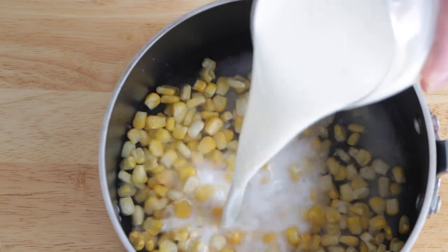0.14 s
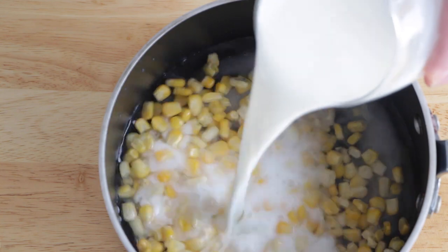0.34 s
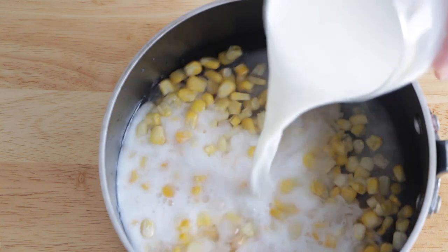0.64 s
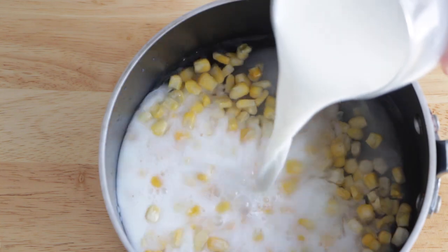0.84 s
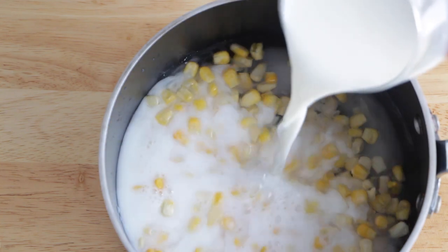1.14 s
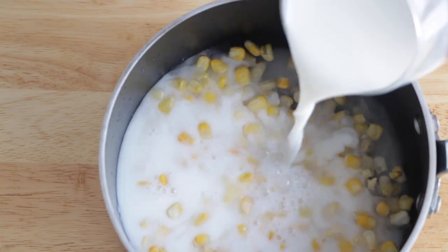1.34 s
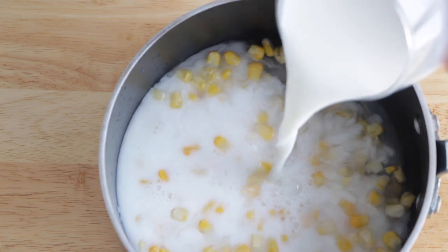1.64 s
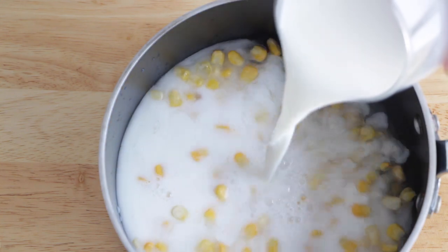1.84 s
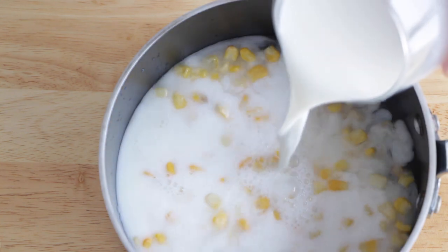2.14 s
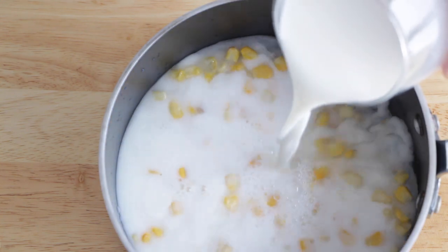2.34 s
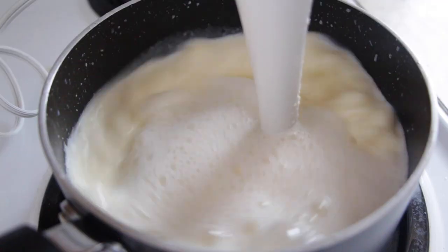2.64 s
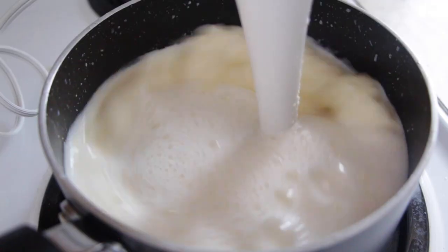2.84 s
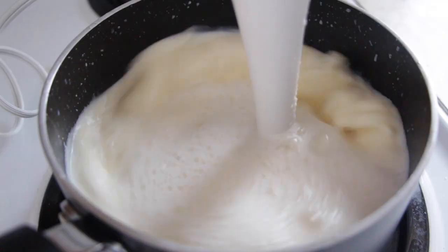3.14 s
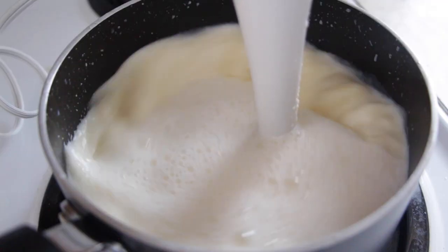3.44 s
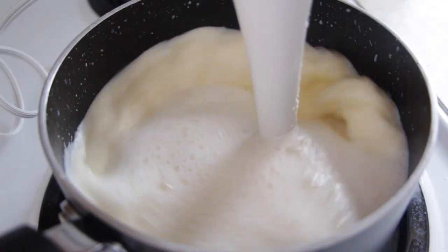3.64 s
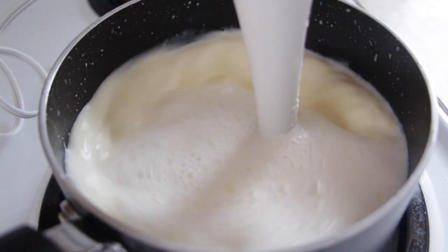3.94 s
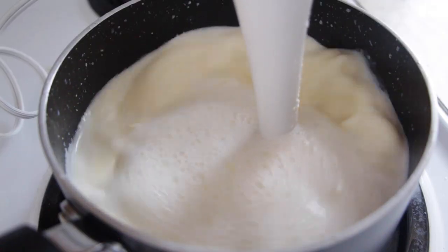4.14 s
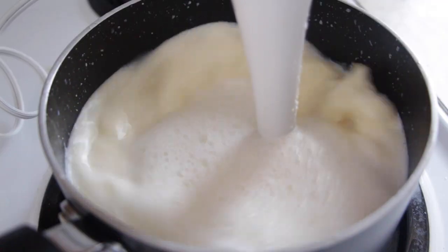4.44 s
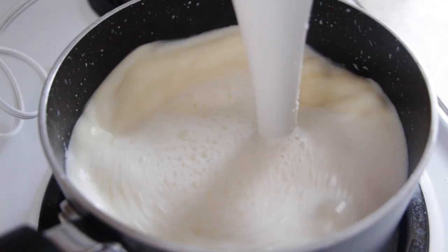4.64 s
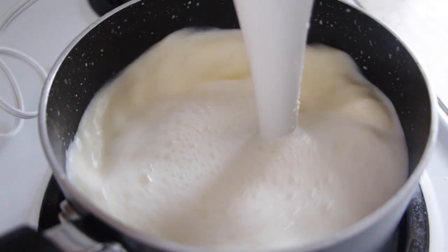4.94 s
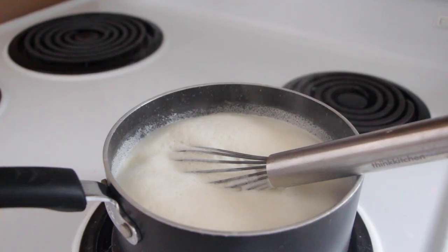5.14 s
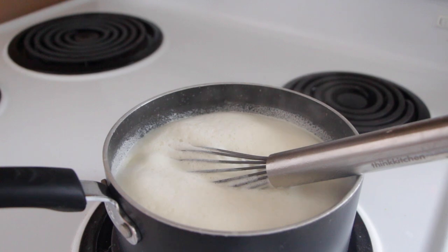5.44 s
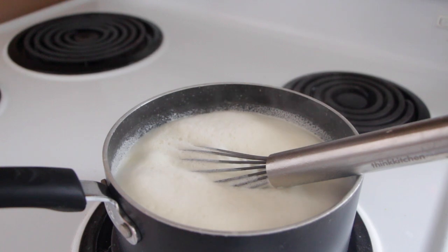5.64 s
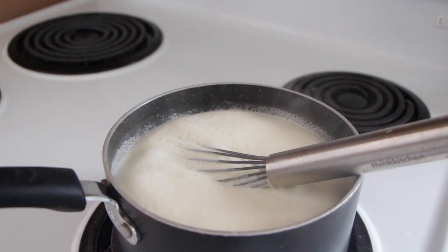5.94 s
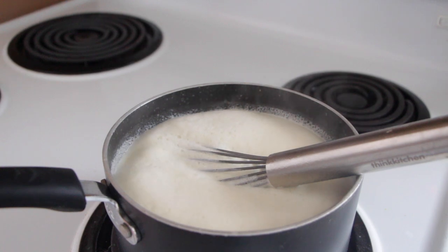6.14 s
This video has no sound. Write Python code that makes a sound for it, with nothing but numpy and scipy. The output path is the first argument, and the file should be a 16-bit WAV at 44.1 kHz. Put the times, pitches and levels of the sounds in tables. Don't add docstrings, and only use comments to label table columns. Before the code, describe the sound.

From 0 to 2.57 s, milk pours into a saucepan of corn, close to a small microphone in a home kitchen. The first half second is the brightest: sharp spatter and plinking drops, with a soft table boom around 0.2 s. A hollow gulp falls in pitch near 0.65 s, then a quieter trickle continues with scattered drips and glugs, busier around 1.5 s, and a snappy splash at 2.42 s, over faint fridge hum. At 2.57 s it cuts instantly to a very loud stick blender: a steady buzzing whine near 270 Hz with many harmonics, sagging and recovering under load, roaring milk, and clusters of hard kernel knocks, strong near 2.6, 2.9, 3.25, 3.7 and 4.1 s. At 5.14 s it drops abruptly to a quiet simmer with low thuds surging around 5.4-5.5 s, a metallic whisk tick at 5.33 s, a fainter one at 5.78 s, and tiny froth pops.

```python
import sys
import numpy as np
from scipy import signal
from scipy.fft import rfft, irfft, next_fast_len
from scipy.io import wavfile
from scipy.ndimage import map_coordinates

SR = 44100
rng = np.random.default_rng(int(sys.argv[2]) if len(sys.argv) > 2 else 0)


def elevation(decibels):
    levels = np.asarray(decibels, float)
    return 10 ** (levels / 20)


def master(y):
    cut = np.clip(np.atleast_2d(y).T, -1, 1)
    pcm = np.round(cut * 32767)
    wavfile.write(sys.argv[1], SR, pcm.astype(np.int16))


N = 276795
T = np.arange(N) / SR
FREE_HZ, CRUISE_HZ = 289.4, 276
CHURN_DB = -27.5


def blender():
    # [t/s, f/Hz]
    speed = [(2.6, 255.5), (2.755, 274.5), (2.93, 261.7), (3.045, 277.7), (3.34, 258.1), (3.52, 270.6),
             (3.72, 260.2), (3.89, 283.3), (4.09, 269.2), (4.25, 277.1), (4.44, 270.2), (4.53, 276.3),
             (4.62, 272.3), (4.96, 278.3), (4.99, 275.7), (5.05, 279.8), (5.13, 283.8)]
    # [t/s, load/dB, rise/s per 10 dB, fall/s per 10 dB]
    kernels = [(2.615, -18.5, 0.1, 0.049), (2.84, -21.5, 0.089, .2), (2.93, -16, 0.06, 0.029),
               (3.2, -20.5, 0.1, 0.0098), (3.24, -19, 0.029, 0.29), (3.35, -26.5, 0.23, .14),
               (3.5, -23.5, 0.065, 0.26), (3.62, -41, 0.22, .2), (3.71, -16, 0.13, 0.044),
               (3.8, -21, 0.048, 0.0047), (4.13, -18.5, 0.14, 0.022), (4.44, -21, 0.076, 0.05),
               (4.68, -28, 0.29, .11), (4.82, -29, 0.019, 0.25), (4.98, -24, 0.041, 0.06),
               (4.52, -17, 0.012, 0.013), (5.05, -30, 0.024, 0.03)]
    hz = eased(speed)
    load_db = swells(kernels, rest_db=-38)
    turn = np.cumsum(hz * (1 + 0.0006 * wobble(60))) / SR
    return whine(hz, load_db, turn) + churn(turn) + flung_milk(hz) + knocks(load_db, turn)


def whine(hz, load_db, turn):
    # [multiple of shaft speed, level/dB]
    shaft = [(1, 0), (2, -2.5), (3, -11), (4, -10.5), (5, -14), (6, -7.5), (7, -12.5), (8, -21), (9, -10.5),
             (10, -23), (11, -12.5), (12, -21), (13, -28), (14, -15), (15, -16), (16, -23), (17, -25)]
    # [multiple of shaft speed, level/dB]
    commutator = [(18, -26), (20, -21), (21, -26), (23, -30), (24, -25), (27, -25), (29, -28), (30, -21.5),
                  (33, -20.5), (40, -29)]
    # [multiple of shaft speed, level/dB]
    vent_orders = [(34, -4), (35, -1), (36, 3), (37, -1), (38, -4)]
    # [f/Hz, width/Hz, level/dB]
    vent = [(9820, 750, -21)]
    tone_db = -26.5 + 0.2071 * np.minimum(FREE_HZ - hz, 18)
    out = np.zeros(N)
    for order, db in shaft + commutator:
        rough = order in (3, 5)
        if rough:
            flutter_db = 4.5 * wobble(45)
        else:
            flutter_db = min(0.8 * order, 1.9) * wobble(24)
        if order < 3:
            level_db = tone_db + 0.19 * (order - 1) * (load_db + 26)
        else:
            level_db = CHURN_DB + 3.8
        if 26 < order < 31:
            level_db = level_db + 0.42 * (hz - CRUISE_HZ)
        level_db = level_db + db + flutter_db + 0.4 * rough * (load_db + 24)
        out += elevation(level_db) * shaft_tone(order, turn)
    for order, db in vent_orders:
        lift = abs(resonant(vent)(order * hz)) ** 2 / elevation(vent[0][2])
        out += elevation(CHURN_DB + db + 6 + 1.8 * wobble(25.07)) * lift * shaft_tone(order, turn)
    return out


def shaft_tone(order, turn):
    if order < 3:
        lag_turns = (0.34, 0.14)[order - 1]
        phase = -2 * np.pi * order * lag_turns
    elif order < 9:
        phase = np.angle(guard(order * FREE_HZ)) + 2 * np.pi * 0.09 * wobble(5)
    else:
        phase = -2 * np.pi * rng.random()
    return np.sqrt(2) * np.cos(2 * np.pi * order * turn + phase)


def churn(turn):
    # [f/Hz, level/dB per Hz]
    churn_colour = [(40, -35), (120, -23), (210, -15.5), (400, -19.5), (650, -8), (900, -19), (1500, -9.5),
                    (2700, -17.5), (5100, -25.5), (7200, -17.5), (8100, -24), (9000, -15.5), (12100, -21.5),
                    (12300, -32), (15700, -46)]
    # [f/Hz, width/Hz, level over the churn/dB]
    housing = [(3983, 405, 18.5), (900, 23, 20)]
    gate = 1 + 0.09 * np.cos(2 * np.pi * turn)
    colour = lambda f: elevation(along(churn_colour, f)) * (1 + abs(resonant(housing)(f)))
    roar = unit(filtered(gate * rng.standard_normal(N), colour))
    return elevation(CHURN_DB + 2.5 + 0.6 * wobble(25)) * roar


def flung_milk(hz):
    # [f/Hz, level/dB per Hz]
    slop_colour = [(110, -52), (160, -7), (215, 1.5), (340, -3.5), (460, -1.5), (560, -34)]
    # [f/Hz, level/dB per Hz]
    mist_colour = [(11500, -60), (12300, 3), (15700, -8), (15900, -80)]
    drag_hz = CRUISE_HZ - hz
    slop = elevation(-44 + 0.53 * drag_hz + 2.6 * wobble(15)) * noise(slop_colour)
    fine_mist = elevation(-57 + 0.14 * drag_hz + 1.5 * wobble(14)) * noise(mist_colour)
    return slop + fine_mist


def knocks(load_db, turn):
    # [t/s, peak/dB, ring f/Hz]
    whole_kernels = [(2.581, -13, 1380), (2.601, -12, 1130), (2.609, -5, 1450), (2.617, -11, 1420),
                     (2.645, -12, 1200), (2.817, -13, 900), (2.84, -10, 1050), (2.852, -13, 1000),
                     (2.904, -11, 1000), (2.919, -9, 1170), (2.931, -6, 1090), (2.939, -8, 1110),
                     (2.954, -13, 1200), (3.075, -13, 1090), (3.234, -8, 1240), (3.242, -12, 1160),
                     (3.249, -5, 1300), (3.253, -8, 1400), (3.272, -8, 1050), (3.283, -10, 950),
                     (3.306, -10, 1200), (3.329, -9, 950), (3.338, -10, 950), (3.347, -12, 1000),
                     (3.658, -10, 1310), (3.673, -6, 1140), (3.688, -10, 1300), (3.7, -8, 1240),
                     (3.711, -8, 1310), (3.719, -3, 1220), (3.731, -10, 1250), (3.764, -12, 1320),
                     (3.772, -12, 1160), (3.791, -11, 1100), (3.798, -10, 1200), (4.046, -12, 1070),
                     (4.065, -11, 1210), (4.09, -9, 1340), (4.098, -11, 1110), (4.105, -7, 1070),
                     (4.116, -10, 1280), (4.12, -9, 1240), (4.124, -10, 1390), (4.377, -14, 950),
                     (4.418, -12, 1100), (4.438, -11, 1000), (4.457, -10, 1160), (4.519, -9, 1100),
                     (4.672, -14, 1500), (4.818, -13, 1500), (4.981, -6, 1380), (5.049, -9, 1390)]
    blow_at = np.flatnonzero(np.diff(np.floor(turn)))
    draw = rng.standard_normal((len(blow_at), 2))
    sizes = elevation(3.5 * np.clip(draw[:, 0], -3, 1) + 1)
    struck = [np.argmin(abs(blow_at - s * SR)) for s, db, ring_hz in whole_kernels]
    sizes[struck] = 0
    jittered = np.clip(blow_at + (6 * draw[:, 1]).astype(int), 0, N - 1)
    blows = np.bincount(jittered, sizes, N)
    spatter = 0.025 * (1 + np.cos(2 * np.pi * turn)) * rng.standard_normal(N)
    force_db = 1.6 * (load_db + 22)
    ordinary = filtered((blows + spatter) * elevation(force_db + 4), guard)

    floor = lambda f: (1j * f / (420 + 1j * f)) ** 2
    impulse = np.eye(1, 400)[0]
    crest = np.argmax(filtered(impulse, lambda f: guard(f) * floor(f)))
    t, cracks = np.arange(-80, 400) / SR, np.zeros(N)
    for which, (s, db, ring_hz) in zip(struck, whole_kernels):
        at = blow_at[which] + crest - 80
        cycles = np.where(t < 0, 0.6, 1.1)
        ring = np.cos(2 * np.pi * ring_hz * t) * np.exp(-abs(t) * ring_hz / cycles)
        cracks[at:][:len(t)] += elevation(db - 1.5) * ring

    gurgle_db = -41 + 0.54 * (load_db + 20.5) + 2.5 * wobble(12)
    gurgle = elevation(gurgle_db) * grains(count=1500, hz=900, spread=0.2, cycles=2.5, scatter_db=3)
    return cracks + filtered(ordinary + gurgle, floor)


def guard(f):
    # [f/Hz, width/Hz, level/dB]
    bell = [(920, 230, 6.5), (1390, 660, 0), (2700, 1100, -14)]
    return -resonant(bell)(f) / (1 + 1j * f / 4900)


def pour():
    # [t/s, level/dB]
    flow = [
        (0.0, -53),
        (0.06, -50.5),
        (0.19, -55),
        (0.3, -55),
        (0.55, -52),
        (0.9, -55.5),
        (1.55, -52.5),
        (1.9, -52.5),
        (2.33, -55),
        (2.56, -51.5),
    ]
    # [t/s, level/dB]
    splash = [(0.02, -71), (0.08, -47), (0.138, -37.5), (0.19, -43.5), (0.29, -57), (0.42, -52),
              (0.62, -65), (1.38, -67.5), (1.52, -61), (1.72, -61), (1.86, -65)]
    # [f/Hz, level/dB per Hz]
    fizz_colour = [(880, -58), (1800, -22), (2470, -0.5), (3060, -1), (3540, -4), (4660, 2.5), (5450, -3.5),
                   (7090, 1.5), (7600, 2.5), (15500, 8)]
    (flow_db,) = curves(flow)
    (fizz_db,) = curves(splash)
    fizz = grains(count=6000, hz=4400, spread=0.5, cycles=5.7, scatter_db=6.5)
    fizz = unit(filtered(fizz, lambda hz: elevation(along(fizz_colour, hz))))
    gurgle = grains(count=2000, hz=1180, spread=0.386, cycles=4, scatter_db=-0.5)
    stream = elevation(fizz_db + 2.5) * fizz + elevation(flow_db - 2 + 1.63 * wobble(12.37)) * gurgle
    return stream + drops() + sprays() + glugs() + kitchen()


def drops():
    # [t/s, peak/dB, bubble f/Hz]
    falling_drops = [(0.0788, -24.5, 2570), (0.089, -20.5, 3120), (0.1, -24, 3040), (0.1117, -21, 3900),
                     (0.131, -35, 1950), (0.132, -25.5, 2480), (0.1695, -28, 2030), (0.762, -46, 4500),
                     (0.1702, -16.5, 3600), (0.171, -22, 2470), (0.2006, -35, 2300), (0.237, -34.5, 2290),
                     (0.336, -26.5, 3220), (0.382, -26, 4430), (0.408, -30.5, 3400), (0.4167, -25, 5140),
                     (0.4708, -35.5, 3330), (0.45, -40, 2700), (0.507, -31.5, 2530), (0.6385, -28, 2690),
                     (0.652, -45, 2820),
                     (0.81, -40.5, 2470), (1.002, -46, 2450), (1.052, -41, 2620), (1.207, -35, 2540),
             (1.224, -46, 4100), (1.251, -29, 2540), (1.181, -48, 2950), (1.3632, -41, 2570),
             (1.366, -42, 4500), (1.429, -41, 2500), (1.545, -33, 4500), (1.587, -37, 3350),
             (1.611, -44, 4600), (1.681, -36, 4400), (1.718, -42, 2480), (1.44, -32, 4060),
             (1.459, -34, 3100), (1.475, -36, 2510), (1.486, -33, 2540), (1.543, -32, 2540),
             (1.579, -36, 3160), (1.609, -40, 3200), (1.643, -34, 3910), (1.664, -30, 4240),
             (1.7399, -33.5, 4030), (1.798, -40.5, 4200), (1.9213, -45, 3950), (1.933, -30, 4030),
             (2.1585, -42, 2500), (2.1923, -32, 2460), (2.2237, -37, 2900), (2.236, -42.5, 2520),
             (2.41, -39, 2900), (2.393, -42.5, 2520), (2.434, -31.5, 2560), (2.478, -42, 4030)]
    # [f/Hz, t60/s]
    pan_wall = [(2500, 0.1), (3350, 0.08), (4050, 0.035)]
    out, t = np.zeros(N + SR), np.arange(SR // 12) / SR
    for s, db, hz in falling_drops:
        wall = np.zeros(len(t))
        for mode_hz, t60 in pan_wall:
            wall += elevation(-27 + rng.normal(0, 3) - 60 * t / t60) * np.sin(2 * np.pi * mode_hz * t)
        late = np.clip(t - 0.012 * rng.random(), 0, 1)
        twin = elevation(-9) * bubble(rng.uniform(2500, 4500), 7, late)
        rise = 1 - np.exp(-0.6 * hz * t)
        add(out, s, elevation(db) * rise * (bubble(hz, 7, t) + twin + wall), room_db=-1)
    return out[:N]


def sprays():
    # [t/s, peak/dB, f/Hz]
    thrown = [(0.0493, -16.5, 11200), (0.0697, -32, 11500), (0.0897, -27, 8150), (0.101, -21.5, 5950),
              (0.171, -20, 6600), (0.202, -25, 6190), (0.2374, -33, 7000), (0.3341, -30.5, 7140),
              (0.381, -37, 11100), (0.4063, -27, 6580), (0.4146, -23.5, 6640), (0.4718, -33, 11100),
              (0.5045, -26.5, 6500), (0.6384, -35, 9420), (0.652, -32.5, 8350), (1.0026, -40, 5810),
              (1.1663, -34.5, 11700), (1.207, -44, 7110), (1.2496, -26.5, 10900), (1.544, -40, 5700),
              (1.664, -40, 5950), (1.932, -35.5, 10400), (2.1914, -41, 9900), (2.2503, -44, 6700),
              (2.4245, -19.5, 7430), (2.432, -32, 7460), (2.4255, -28, 9700)]
    cycles, overtone = 2.67, 1.45
    out, t = np.zeros(N + SR), np.arange(SR // 12) / SR
    for s, db, hz in thrown:
        snap = np.gradient(elevation(-13 - 60 * t / 0.00036) * rng.standard_normal(len(t)))
        ring = bubble(hz, cycles, t)
        if overtone * hz < SR / 3:
            ring = ring + elevation(-10) * bubble(overtone * hz, cycles, t)
        rise = 1 - np.exp(-hz * t / 0.51)
        add(out, s, elevation(db + 5.5) * (ring * rise + snap), room_db=2.5)
    bright = signal.butter(7, 5700, "high", fs=SR, output="sos")
    return signal.sosfilt(bright, out)[:N]


def glugs():
    # [t/s, peak/dB, f/Hz]
    large = [(0.176, -32, 1510), (0.181, -30.5, 675), (0.19, -33, 1500), (0.2, -33, 700), (0.24, -42, 1300),
             (0.468, -36, 1750), (0.5, -36, 1500), (0.509, -32, 1420), (0.53, -40, 1200),
             (0.575, -39, 1450), (0.605, -43, 1250), (1.004, -39.5, 945), (1.035, -38, 1150),
             (1.067, -35.5, 1060), (1.096, -42, 1050), (1.25, -32, 1070), (1.268, -33, 1050),
             (1.31, -44, 1050), (1.44, -43, 1670), (1.484, -33, 1590), (1.508, -26.5, 1490),
             (1.518, -31, 1100), (1.545, -35, 1390), (1.58, -34, 1450), (1.666, -33.5, 1380),
             (1.687, -34, 845), (1.69, -37, 1400), (1.941, -32.5, 1200), (2.158, -38, 745),
             (2.196, -36, 700), (2.19, -34, 1300), (2.383, -40.5, 1140), (2.483, -38, 1250)]
    # [t/s, peak/dB, f/Hz]
    bloop = [
        (0.6405, -30, 730),
        (0.6575, -28, 690),
        (0.672, -33, 650),
        (0.686, -33, 632),
        (0.703, -38, 537),
    ]
    # [t/s, peak/dB, f/Hz]
    slosh = [
        (0.729, -32, 396),
        (1.548, -28, 517),
        (1.589, -38, 260),
    ]
    out, t = np.zeros(N + SR), np.arange(SR // 12) / SR
    glug = lambda db, hz, cycles: elevation(db - 4.5) * bubble(hz, cycles, t) * (1 - np.exp(-hz * t / 0.24))
    for s, db, hz in large:
        add(out, s, glug(db, hz, 2.64), room_db=5.5 + 3 * np.log2(hz / 1000))
    for s, db, hz in bloop:
        swell = (1 - np.exp(-hz * t / 2.9)) ** 2 * np.exp(-hz * t / 2.9)
        sagging = np.sin(2 * np.pi * hz * t * (1 - 1.5 * t))
        add(out, s, elevation(db + 14) * swell * sagging, room_db=-6)
    for s, db, hz in slosh:
        add(out, s, glug(db, hz, 0.76), room_db=6)
    return out[:N]


def snaps():
    # [t/s, peak/dB, f/Hz]
    contacts = [(0.0492, -20, 11100), (0.0518, -21, 11600), (0.0702, -22, 11500), (0.108, -23, 4800),
                (0.113, -24, 4500), (0.133, -23, 4510), (0.1703, -11.5, 4200), (0.1838, -23, 2900),
                (0.2018, -25, 6190), (0.238, -31, 7090), (0.3348, -29, 3320), (0.382, -32, 4430),
                (0.4163, -27, 6600), (0.5048, -28, 6290), (0.638, -33, 2630), (1.1672, -41, 12000),
                (1.2067, -39, 2520), (1.2498, -32, 2520), (1.933, -31, 3890), (2.1595, -36, 2500),
                (1.545, -30, 4500), (1.5085, -34, 1600), (2.4249, -28, 8000), (5.345, -16, 7930),
                (5.351, -15, 5450)]
    out, t = np.zeros(N + SR), np.arange(SR // 200) / SR
    for s, db, hz in contacts:
        add(out, s, elevation(db + 1) * bubble(hz, 0.9, t), room_db=-11)
    return out[:N]


def whisk():
    # [t/s, peak/dB, low modes/dB, hiss/dB]
    ticks = [
        (5.3328, -16.5, 0.5, 1.5),
        (5.775, -29, -21, -0.5),
    ]
    # [f/Hz, level/dB, t60/s]
    wire_modes = [(2040, -12, 0.28), (2820, -9, 0.18), (3470, -2, 0.15), (4020, 1.5, 0.14),
                  (5440, -2, 0.28), (5670, -8, 0.29), (5970, -17, 0.17), (6713, -17, 0.14),
                  (7350, -3, 0.15), (8100, -1, 0.22), (9400, -6, 0.18), (10100, -1.5, 0.11),
                  (10900, -11, 0.17), (11720, -24, 0.15)]
    # [f/Hz, level/dB per Hz]
    tick_air = [(530, -62), (900, -35), (1470, -4.5), (1620, -20), (1990, -15), (3090, -14), (5310, -3.5),
                (12100, -10), (15800, -34)]
    out, t = np.zeros(N), np.arange(SR // 3) / SR
    for s, db, low_db, hiss_db in ticks:
        wires = np.zeros(len(t))
        for hz, level, t60 in wire_modes:
            decay = elevation(level + low_db * (hz < 4500) - 60 * t / t60)
            ring = np.sin(2 * np.pi * (hz * t + 0.13 * wobble(210, size=len(t))))
            wires += decay * (1 - np.exp(-t * hz / 18)) * ring
        colour = [(hz, level + low_db * (hz < 1600)) for hz, level in tick_air]
        colour += [(15998 + 200 * (low_db > 0), -120)]
        air = elevation(hiss_db - 60 * t / 0.31) * noise(colour, size=len(t))
        shape = (1 + 1.2 * np.exp(-t / 0.018)) * (1 - np.exp(-t / 0.003))
        chatter = 1 + 0.1 * wobble(250, size=len(t))
        out[round(s * SR):][:len(t)] += elevation(db - 15.5) * (wires + air) * shape * chatter
    return out


def simmer():
    # [t/s, level/dB, rise/s per 10 dB, fall/s per 10 dB]
    boils = [
        (5.412, -38.5, 0.18, .024),
        (5.516, -39, 0.11, 0.029),
        (5.56, -45, .1, .6),
        (5.91, -43, 0.52, .035),
        (6.18, -46, 2.5, 0.034),
        (6.26, -51, .12, .02),
    ]
    # [f/Hz, width/Hz, level/dB]
    pan_modes = [(111, 29, -7), (231.6, 34, 1), (339, 21.3, 1.5), (416, 51, -3.5)]
    # [f/Hz, level/dB per Hz]
    stove_air = [(15, -48), (25, -13), (157, -16), (222, -2), (276, -8.5), (425, -9), (587, -15),
                 (791, -15.5), (1120, -21.5), (4570, -30), (5520, -33.5), (10500, -27.5), (15800, -38)]
    ring = resonant(pan_modes)
    thuds = rng.standard_normal(N) * elevation(np.clip(5.4 * wobble(50), -8, 5))
    rumble = elevation(swells(boils, rest_db=-59)) * unit(filtered(thuds, lambda f: ring(f) ** 2))
    boom = elevation(-61.5 + 3.4 * wobble(11)) * table()
    return rumble + elevation(-48.5) * noise(stove_air) + boom + fridge_line(db=-57) + whisk()


def froth():
    # [t/s, peak/dB, f/Hz]
    foam = [
        (5.4635, -44, 10500),
        (5.731, -52, 7000),
        (5.743, -52, 6000),
        (5.847, -48, 10500),
        (5.855, -52, 8500),
        (5.876, -46, 9000),
        (5.888, -50, 7000),
        (5.941, -48, 10500),
    ]
    out, t = np.zeros(N + SR), np.arange(SR // 200) / SR
    for s, db, hz in foam:
        add(out, s, elevation(db) * bubble(hz, 2.5, t) * (1 - np.exp(-hz * t)), room_db=-8)
    return out[:N]


def nudged_table():
    # [t/s, level/dB, rise/s per 10 dB, fall/s per 10 dB]
    nudges = [(0.14, -31.5, .02, 0.1), (0.26, -28, 0.1, 0.038), (0.41, -46, .05, .06),
              (0.8, -50, 0.99, 0.16), (1.1, -46.5, .15, 0.041), (1.28, -50.5, .02, .7),
              (1.58, -48, .07, 0.092), (1.78, -44, 0.089, 0.033), (2.06, -53, .9, .03),
              (2.57, -48, 0.091, 0.038), (2.93, -54.5, 0.25, 0.05), (3.35, -44.5, 0.081, 0.096),
              (3.6, -49, .1, 0.2), (3.86, -55, .02, 0.019), (4.28, -54.5, 0.61, 0.026),
              (4.36, -51.5, 0.016, 0.29), (4.84, -53.5, 0.36, 0.019), (5.14, -53, .02, 0.022)]
    return elevation(swells(nudges, rest_db=-67)) * table()


def table():
    return np.sqrt(2) * np.sin(2 * np.pi * (82 * T + 0.14 * wobble(11)))


def kitchen():
    # [f/Hz, level/dB]
    hum = [(118.4, -53), (263.8, -61.5), (360.7, -65), (538.3, -63), (748.3, -87)]
    # [f/Hz, level/dB per Hz]
    kitchen_air = [(15, -45), (25, 2), (107, 1.5), (141, -6.5), (184, -10), (255, -5), (437, -16),
                   (527, -12), (729, -25), (2260, -19.5), (2460, -54), (5520, -31.5), (15800, -32)]
    out = elevation(-54.5) * noise(kitchen_air)
    for hz, db in hum:
        line = np.sin(2 * np.pi * (hz * T + 0.2 * wobble(6.2)))
        out += elevation(db + 1.5 + 1.1 * wobble(7.25)) * line
    return out


def fridge_line(db):
    return elevation(db + 1.9 * wobble(3.9)) * np.sin(2 * np.pi * (118 * T + 0.11 * wobble(7)))


def left_right_difference(quiet):
    # [f/Hz, level/dB per Hz]
    hiss_colour = [(59, -54), (100, -22), (396, -5), (2240, -10), (2710, -6), (3720, -5), (15700, -3)]
    # [t/s, level/dB]
    treble_bursts = [
        (3.165, -43),
        (3.515, -42),
        (3.835, -47),
        (4.0, -41),
    ]
    treble = noise([(5300, -120), (5500, 0), (11000, -2), (13500, -8), (13800, -120)])
    side = elevation(-66.5) * noise(hiss_colour) * quiet
    for s, db in treble_bursts:
        side += treble * elevation(db) * np.clip(1.5 - abs(T - s) / 0.016, 0, 1)
    return side


def bubble(hz, cycles, t):
    turns = hz * t / np.clip(cycles, 0.5, 30)
    return np.sin(2 * np.pi * hz * t * (1 + 0.0039 * turns)) * np.exp(-turns)


def grains(count, hz, spread, cycles, scatter_db):
    draw = rng.random((count, 2))
    pitch = np.clip(hz * np.exp(spread * rng.standard_normal(count)), 200, 15000)[:, None]
    t = np.arange(400) / SR
    size = elevation(scatter_db * (4.3 * draw[:, 1:] - 2))
    ring = np.sin(2 * np.pi * pitch * t) * np.exp(-pitch * t / cycles) * size
    at = (draw[:, :1] * N).astype(int) + np.arange(400)
    close = np.bincount(at.ravel(), ring.ravel(), N + 400)[:N]
    return unit(close + elevation(1.5) * signal.fftconvolve(close, echo())[:N])


def add(out, s, close, room_db):
    wet = elevation(room_db) * signal.fftconvolve(close, echo())
    start = round(s * SR)
    out[start:][:len(close)] += close
    out[start + 60:][:len(wet)] += wet


def echo():
    # [f/Hz, t60/s]
    room = [(500, 0.28), (3000, 0.18), (12000, 0.17)]
    hz, t, z = signal.stft(rng.standard_normal(SR // 4), SR, nperseg=256)
    decay = elevation(-60 * t / along(room, hz)[:, None])
    tail = signal.istft(z * decay, SR, nperseg=256)[1]
    return tail / np.linalg.norm(tail)


def swells(rows, rest_db):
    levels = []
    for s, db, rise, fall in rows:
        levels.append(db - 10 * np.where(T < s, (s - T) / rise, (T - s) / fall))
    return np.max(levels, axis=0).clip(rest_db)


def eased(rows):
    s, v = np.transpose(rows)
    index = np.arange(len(s))
    step, part = np.divmod(np.interp(T, s, index), 1)
    return np.interp(step + 0.5 - 0.5 * np.cos(np.pi * part), index, v)


def curves(rows):
    s, *cols = np.transpose(rows)
    return [np.interp(T, s, c) for c in cols]


def wobble(rate, size=N):
    knots = rng.standard_normal(int(size * rate / SR) + 4)
    return map_coordinates(knots, [T[:size:8] * rate]).repeat(8)[:size]


def noise(spectrum, size=N):
    return unit(filtered(rng.standard_normal(size), lambda hz: elevation(along(spectrum, hz))))


def resonant(modes):
    def response(f):
        total = 0
        for k, (c, w, db) in enumerate(modes):
            total = total + (-1) ** k * elevation(db) * 1j * f * w / (c * c - f * f + 1j * f * w)
        return total
    return response


def filtered(x, response):
    m = next_fast_len(len(x) + 8192)
    return irfft(rfft(x, m) * response(np.fft.rfftfreq(m, 1 / SR)), m)[:len(x)]


def along(points, hz):
    f, v = np.transpose(points)
    return np.interp(np.log(hz + 1), np.log(f + 1), v)


def unit(x):
    return x / np.sqrt(np.mean(x ** 2) + 1e-20)


def scene():
    cuts = (2.5748, 5.144)
    first, second = (np.clip((T - s) / 0.000087, 0, 1) for s in cuts)
    mono = (1 - first) * pour() + first * (1 - second) * blender() + second * simmer()
    mono += snaps() + froth() + (1 - second) * nudged_table()
    side = left_right_difference(quiet=1 - first + second)
    fade_in = np.clip((T - 0.004) / 0.0016, 0, 1)
    return np.array([mono + side, mono - side]) * fade_in


def roll_off(x):
    return signal.sosfilt(signal.butter(12, 16630, fs=SR, output="sos"), x)


def record(dry):
    kept = np.array([filtered(x, lambda hz: hz < 15750) for x in dry])
    return roll_off(kept)


dry = scene()
out = record(dry)
master(out)
```